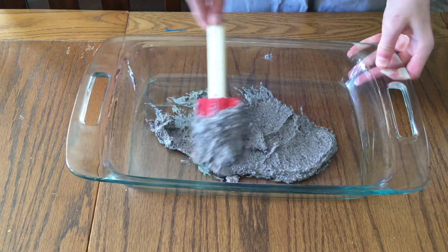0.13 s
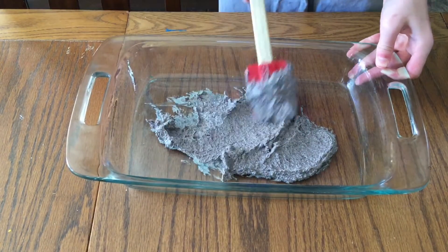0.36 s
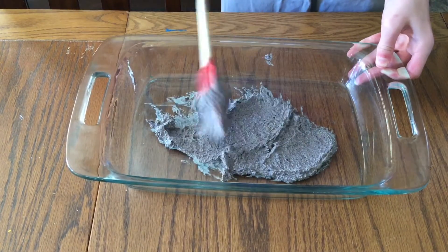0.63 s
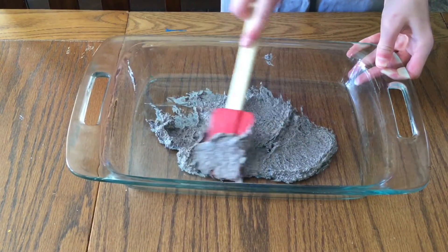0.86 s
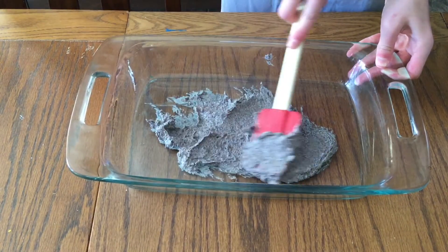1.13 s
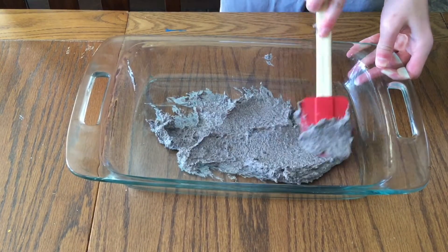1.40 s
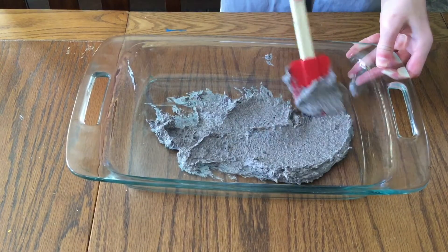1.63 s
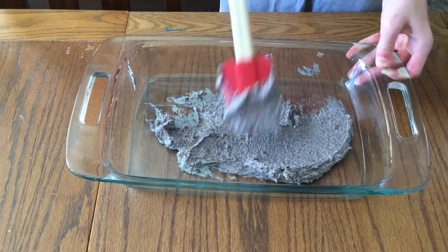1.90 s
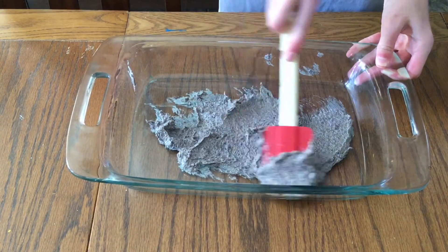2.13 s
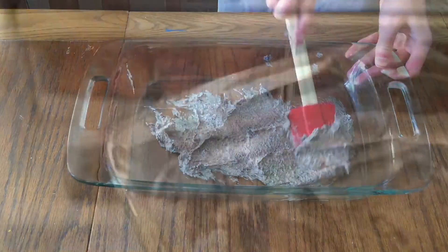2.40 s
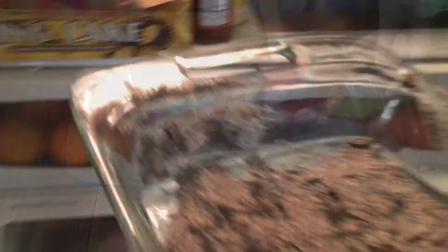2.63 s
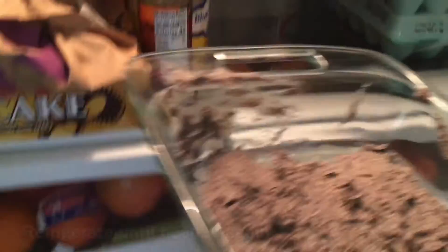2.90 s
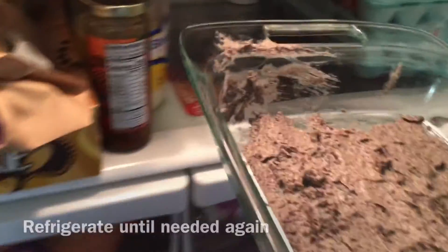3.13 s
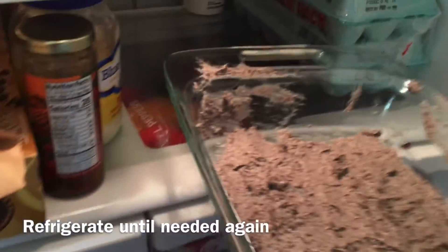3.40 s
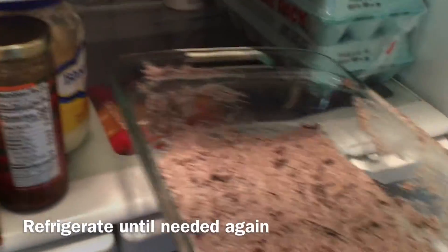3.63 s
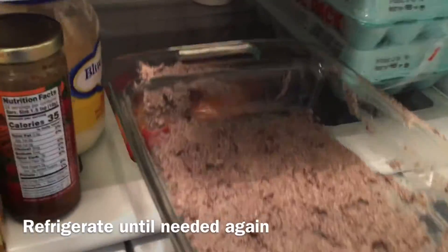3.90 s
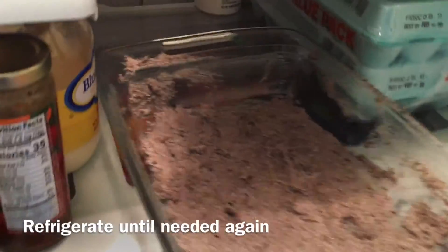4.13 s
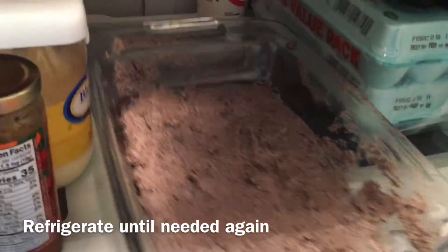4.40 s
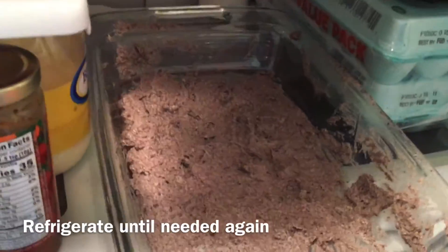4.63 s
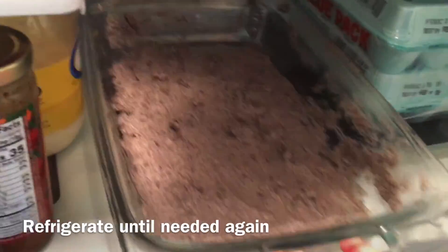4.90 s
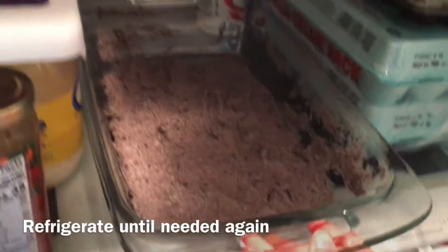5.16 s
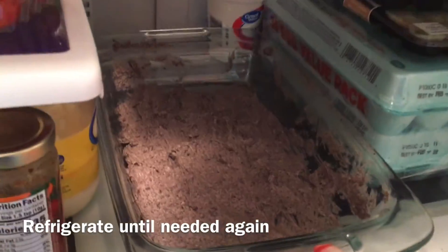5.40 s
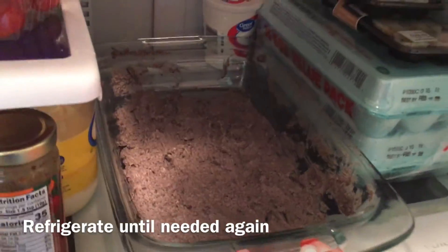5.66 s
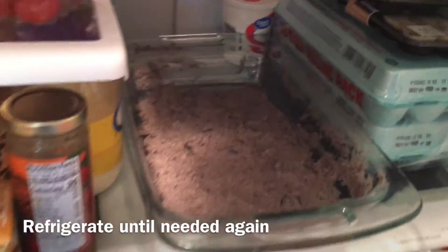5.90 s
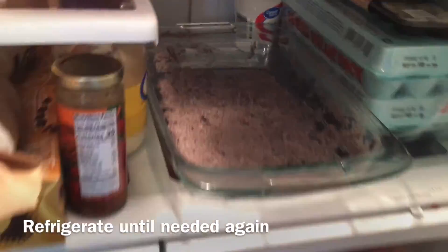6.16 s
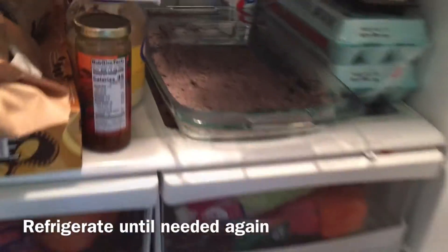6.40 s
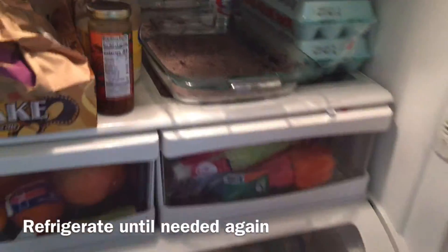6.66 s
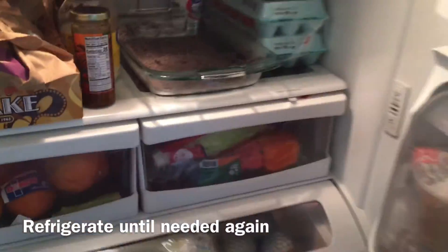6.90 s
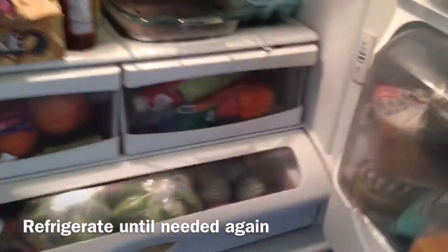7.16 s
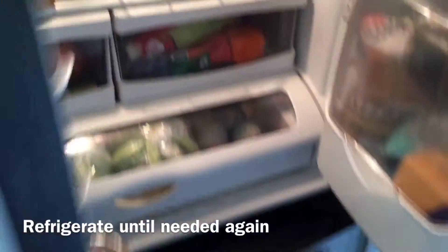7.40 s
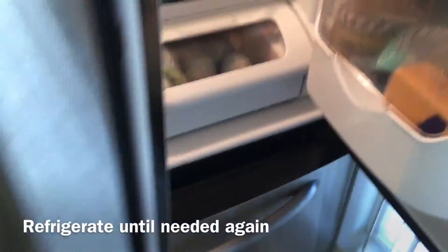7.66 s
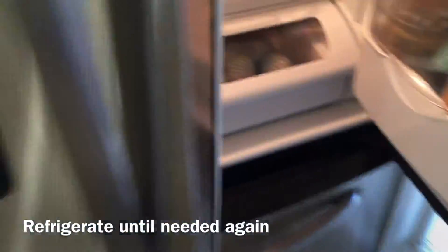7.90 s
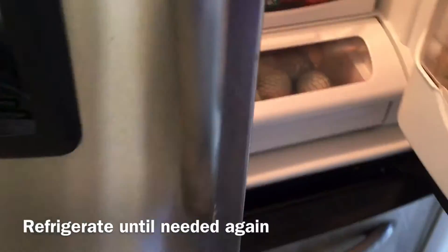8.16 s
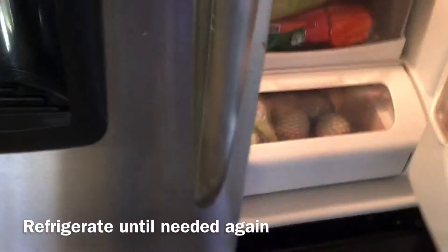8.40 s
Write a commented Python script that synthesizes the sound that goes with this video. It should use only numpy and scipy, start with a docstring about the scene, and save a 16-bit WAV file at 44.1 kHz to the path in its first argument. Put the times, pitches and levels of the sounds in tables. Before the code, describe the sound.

Quiet spreading of thick paste in glass, with soft rubs and light ticks, comes first. Then a nearby fridge's low rumble and steady fan rise. Around the middle, hard woody, glassy knocks and deep thumps land in quick succession, one overloading the close microphone, followed by scraping and lighter taps. Soft handling noise and a thin squeak lead to a sharp double thud of the closing door at the end.

```python
"""First a soft spatula spreads a sticky mixture in a glass dish: grainy rubbing, tiny pops and light ticks over
mains hum and the rush of air. As the microphone goes from the table to the fridge, rumble and fan tones grow.
The dish is then set down on a shelf and pushed in: knocks ring the shelf and the glass, sliding hisses and
fittings squeak faintly; the loudest knock overloads the microphone. Last, the door is swung shut.
Noise is shaped for rubbing, air, squeaks and clacks; sines make the steady tones and the fading rings."""
import sys
import numpy as np
from scipy import signal
from scipy.fft import rfft, irfft
from scipy.io import wavfile
from scipy.ndimage import uniform_filter1d

SR = 44100
rng = np.random.default_rng(int(sys.argv[2]) if len(sys.argv) > 2 else 0)


def unload_wav(signal):
    """Save mono or channel-first audio to the path in sys.argv[1] as 16-bit WAV at rate SR, clipped to [-1, 1]."""
    wavfile.write(
        sys.argv[1],
        SR,
        np.round(np.clip(np.atleast_2d(signal).T, -1, 1) * 32767).astype(np.int16),
    )


def voltage_ratio(level):
    """Linear amplitude factor for a level in decibels (scalar or array-like)."""
    return 10 ** (np.asarray(level, float) / 20)


N = 376613  # length in samples


def along(table):
    """Turn a table of times and values into curves: each column, one value per sample."""
    s, *columns = np.transpose(table)
    return [np.interp(np.arange(N) / SR, s, c) for c in columns]


def unit(x):
    """Scale to rms 1."""
    return x / np.sqrt(np.mean(x ** 2))


def colour(x, points):
    """Shape a spectrum by (Hz, dB) points, joined on a logarithmic pitch scale; rms 1."""
    hz, db = np.transpose(points)
    f = np.arange(len(x) // 2 + 1) * SR / len(x) + 1
    curve_db = np.interp(np.log(f), np.log(hz), db)
    return unit(irfft(rfft(x) * voltage_ratio(curve_db), len(x)))


def walk(rate):
    """Slow random wandering: levels held 1 / rate seconds, then smoothed twice; spread near 1."""
    k = int(SR / rate)
    steps = np.repeat(rng.standard_normal(N // k + 1), k)
    return 1.14 * uniform_filter1d(uniform_filter1d(steps, k), k)[:N]


def tones(lines, waver_db):
    """Steady sines given as (Hz, rms dB), each with a level that wavers on its own."""
    t = np.arange(N) / SR
    out = np.zeros(N)
    for hz, db in lines:
        sine = np.sqrt(2) * np.sin(2 * np.pi * (hz * t + rng.random()))
        out += voltage_ratio(db + waver_db * walk(4.1)) * sine
    return out


def ring(modes, centre_hz, octaves, fall_db, luck, t):
    """A blow feeds fading modes near its centre most, higher ones less and less; rms 1 over the first 30 ms."""
    hz, db, t60 = np.array(modes, float).T[:, :, None]
    above = np.log2(hz / centre_hz)  # octaves above the centre
    share = np.exp(-.5 * (above / octaves) ** 2) + (above > 0) * voltage_ratio(fall_db * (2 + above))
    spot = voltage_ratio(1.5 * luck[:len(modes), None])  # each mode's chance gain or loss
    waves = np.sin(2 * np.pi * hz * t) * 1000 ** (-t / t60)
    y = np.sum(share * voltage_ratio(db) * spot * waves, axis=0)
    return y / np.sqrt(np.mean(y[t < .03] ** 2))


# How near the microphone is to the fridge's works.
# Each row: time in seconds, nearness in dB.
NEARNESS = [(0, -10), (1.0, -11), (1.9, -10), (2.2, -7.5), (2.4, -9), (2.65, -4), (2.96, 0), (3.64, 2),
            (4.32, 4), (5.16, 4.5), (5.79, 3), (6.16, 2), (6.41, -1), (6.87, -2), (7.38, -1.5),
            (7.75, -2.5), (8.08, -1), (8.54, -3)]


def near_gain(base_db, db_per_near_db):
    """A source's gain: its level at nearness 0, plus so many dB for each dB of nearness."""
    return voltage_ratio(base_db + db_per_near_db * along(NEARNESS)[0])


def at_table():
    """1 while the microphone is at the table, sinking to 0 as it leaves for the fridge."""
    return np.interp(np.arange(N) / SR, (2.1, 2.65), [1, 0])


# The low hum.
# Each row: pitch in Hz, level in dB before the hum's overall gain.
HUM_LINES = [(120.5, -2.5), (241, -21.5)]


def low_hum():
    """Wavering sines: mains hum at the table; near the fridge, a low resonance at about the same pitch."""
    gain = near_gain(-49.5, 2.2) + voltage_ratio(-42.5) * at_table()
    return gain * tones(HUM_LINES, 2.0)


# The colour of the rushing air.
# Each row: frequency in Hz, relative level in dB.
RUSH_COLOUR = [(150, -49), (260, -4.5), (322, -11.5), (355, -9), (404, -6.5), (531, -11), (652, -9),
               (1600, -27), (2080, -42.5), (3520, -120)]


def air_rush():
    """Unsteady air heard as shaped noise, 5 dB further off at the table."""
    noise = colour(rng.standard_normal(N), RUSH_COLOUR)
    return noise * near_gain(-50, .2) * voltage_ratio(-5 * at_table() + .7 * walk(20))


# The colour of the compressor's rumble.
# Each row: frequency in Hz, relative level in dB.
RUMBLE_COLOUR = [(15, -40.5), (25, -21), (42, -14.5), (59, 7.5), (75, -3), (91, 4.5), (150, 2.5),
                 (167, 0.5), (203, 0.5), (330, -9.5), (430, -45), (730, -120)]


def compressor_rumble():
    """The compressor's uneven deep rumble is shaped noise, growing with nearness."""
    noise = colour(rng.standard_normal(N), RUMBLE_COLOUR)
    return noise * near_gain(-40, 1.1) * voltage_ratio(1.6 * walk(9))


def drone():
    """One low sine that wavers and grows a little with nearness."""
    return near_gain(-50, .5) * tones([(148.5, 0)], 1.8)


# The fan's tones.
# Each row: pitch in Hz, level in dB before the fan's overall gain.
FAN_LINES = [(351, 6.5), (525, 5)]


def fan_tones():
    """Steady sines of the fan, growing with nearness."""
    return near_gain(-62.5, 1.6) * tones(FAN_LINES, 1)


# The whine comes and goes.
# Each row: time in seconds, level in dB.
WHINE_LEVEL = [(0, -95), (2.2, -92), (2.96, -80), (5.2, -77), (5.5, -71), (5.9, -72), (6.35, -82),
               (7.5, -84), (7.8, -76), (8.1, -85), (8.54, -85)]


def whine():
    """One thin, very high sine whose level follows the table and wavers."""
    return voltage_ratio(along(WHINE_LEVEL)[0]) * tones([(14400, 0)], 1.5)


# Strokes of blade, dish, hands and door seal; the row at 3.52 is the noisy tail of a knock.
# Each row: start in seconds, end in seconds, grit level in dB, fine hiss above grit in dB, onset in dB per second.
GRAIN_BURSTS = [(.07, .08, -66, 0, 300), (.17, .26, -60, -8, 300), (.3, .38, -61, -5, 200),
                (.45, .53, -60, -4, 300), (.65, .69, -63, 0, 150), (.8, .94, -58.5, -3, 150),
                (1.2, 1.6, -68, -1, 100), (1.63, 1.74, -56, -11, 300), (2.12, 2.14, -53, -5, 160),
                (2.22, 2.45, -64, -5, 100), (2.6, 2.72, -60, -4, 60), (2.87, 2.95, -60, 0, 80),
                (3.08, 3.36, -59, 4, 60), (3.52, 3.54, -35, -10, 3000), (3.82, 3.9, -40, -5, 2000),
                (4.01, 4.09, -37, -14, 2000), (4.17, 4.49, -42, -2, 300), (4.745, 5.22, -46, 1, 150),
                (5.085, 5.11, -41, 1, 400), (5.15, 5.23, -44, 3, 200), (5.7, 5.71, -55, -8, 500),
                (5.77, 5.86, -56, -4, 300), (6.15, 6.2, -62, 1, 60), (6.46, 6.52, -60, 4, 100),
                (6.6, 8.05, -59.5, -5, 40), (7.02, 7.2, -54, 0, 40), (7.55, 7.67, -60, 8, 150),
                (7.8, 7.86, -61, 5, 60), (8.04, 8.1, -52, -3, 80), (8.3, 8.35, -54, 5, 150),
                (8.365, 8.42, -29, -2, 3000), (8.485, 8.6, -29, -1, 2000)]


def grain_gains():
    """Gains of grit and hiss: each row rises, eases and dies by one rule, over a faint background noise."""
    t = np.arange(N) / SR
    # the background noise of room and microphone, set to grow with nearness
    grit_power = near_gain(-64, .45) ** 2
    hiss_power = near_gain(-68.5, .45) ** 2
    for start, end, db, fine_db, onset in GRAIN_BURSTS:
        rise_db = onset * np.clip(start - t, 0, 1)
        sag_db = 6 * np.clip(t - start, 0, .5)  # 6 dB per second for half a second
        # it lets go as it came, but no faster than 190 dB per second
        release_db = min(onset, 190) * np.clip(t - end, 0, 1)
        power = voltage_ratio(db - rise_db - sag_db - release_db) ** 2
        grit_power = grit_power + power
        hiss_power = hiss_power + power * voltage_ratio(fine_db) ** 2
    return np.sqrt(grit_power), np.sqrt(hiss_power)


def patchy(x, depth_db, rate):
    """Each octave swells and sinks alone, as the rubbing spot wanders over the surface."""
    spectrum = rfft(x)
    hz = np.arange(len(x) // 2 + 1) * SR / len(x)
    octave = np.clip(np.log2(hz / 500 + 1e-9), 0, 5)
    out = np.zeros(len(x))
    for k in range(6):
        band = irfft(spectrum * np.clip(1 - abs(octave - k), 0, 1), len(x))
        out += band * voltage_ratio(depth_db * walk(rate))
    return out


# The colour of the coarse grains.
# Each row: frequency in Hz, relative level in dB.
GRIT_COLOUR = [(530, -32), (900, -4), (1400, -1), (1520, -1), (2290, -1), (4670, -5.5), (5740, -14),
               (6500, -12), (8450, -38), (14300, -120)]
# The colour of the fine grains.
# Each row: frequency in Hz, relative level in dB.
HISS_COLOUR = [(2650, -40), (4500, -10), (5770, -4.5), (6560, -7), (7740, -5), (8410, -1.5), (10200, -3.5),
               (13100, -1.5), (15500, -6.5)]
# Ringing of the loaded glass dish, also used by the knocks.
# Each row: pitch in Hz, relative level in dB, seconds to fall 60 dB if nothing else damps it.
GLASS_MODES = [(1088, -3.5, .09), (1148, 24, 0.027), (1456, -9.5, .1), (1694, -9, .1), (1980, 10, 0.16),
               (2313, 2, .1), (2300, -10.5, .07), (2665, 6.5, 0.062), (3110, 6, 0.06), (3370, -8.5, .08),
               (4230, -15.5, .09), (4900, -5, .05), (5400, -18.5, .06)]


def slide():
    """Friction, with the background noise: dense uneven grains, coarse in the mids and fine in the treble."""
    grit_gain, hiss_gain = grain_gains()
    bumps_db = 2.6 * uniform_filter1d(rng.exponential(size=N), size=8)
    grains = rng.standard_normal(N) * voltage_ratio(bumps_db)
    catch = walk(35)  # the contact grips and lets go
    body = ring(GLASS_MODES, 2400, 1.2, -20, np.zeros(len(GLASS_MODES)), np.arange(SR // 8) / SR)
    # the rougher catches also set the glass ringing
    rung = unit(signal.fftconvolve(grains * voltage_ratio(4.0 * walk(40)), body)[:N])
    grit = unit(colour(grains, GRIT_COLOUR) + .4 * rung)
    grit = grit * grit_gain * voltage_ratio(1.2 * catch + 1.6 * walk(60))
    hiss = colour(grains, HISS_COLOUR) * hiss_gain * voltage_ratio(0.64 * catch + 1.5 * walk(60))
    return patchy(grit + hiss, depth_db=1.8, rate=22)


# The treble of a hard contact, for the pops and the knocks.
# Each row: frequency in Hz, relative level in dB.
SNAP_COLOUR = [(2000, -5), (4000, 5), (8000, -3), (14000, -3.5), (20000, -22)]


def paste():
    """The mixture parts from the blade in tiny pops, strongest while the blade rubs hardest."""
    hiss_gain = grain_gains()[1]
    rate, end_s = 90, 1.7  # average pops per second, last moment
    pops = (rng.random(N) < rate / SR) * voltage_ratio(3.0 * rng.exponential(size=N))
    pops = pops * (np.arange(N) < end_s * SR)
    tail = np.convolve(pops, np.exp(-np.arange(128) / 10.0))[:N]  # each pop lasts about a millisecond
    strength = voltage_ratio(-61) * (hiss_gain / hiss_gain[0]) ** .7
    return strength * tail * colour(rng.standard_normal(N), SNAP_COLOUR)


# Light ticks.
# Each row: time in seconds, peak level in dB, centre in Hz.
LIGHT_TICKS = [(0.0755, -34.5, 9000), (0.0844, -45, 6010), (0.164, -44, 2250), (0.279, -42, 1980),
               (0.3007, -40, 3450), (0.3347, -43.5, 5000), (0.348, -47, 1880), (0.4404, -32, 4260),
               (0.4555, -36, 9000), (0.7262, -42.5, 3030), (1.161, -46, 4320), (1.1951, -47.5, 1990),
               (2.143, -40, 3500), (1.622, -31, 1300), (4.3977, -28, 3200), (4.4922, -26.5, 2470),
               (4.6675, -39, 3500), (4.7084, -38, 3000), (5.0931, -23, 3200), (5.094, -22, 12000),
               (5.1644, -36.5, 2060), (5.218, -20.5, 13800), (5.3053, -32.5, 9430), (5.6936, -26, 8430),
               (5.7543, -33, 8410), (5.7638, -31.5, 4280), (6.1603, -32, 2500), (6.9862, -41, 5150)]


def ticks():
    """Light contacts: very short noise about one broad resonance, falling 60 dB in 27 ms."""
    t = np.arange(SR // 10) / SR
    out, noise = np.zeros(N + len(t)), rng.standard_normal(N + len(t))
    for s, peak_db, hz in LIGHT_TICKS:
        now = slice(int(s * SR), int(s * SR) + len(t))
        body = colour(noise[now], [(0.061 * hz, -40), (0.26 * hz, -8), (hz, 0), (2.4 * hz, -9), (6 * hz, -32)])
        tick = body * (1 - np.exp(-t / 0.0007)) * 1000 ** (-t / .027)
        out[now] += voltage_ratio(peak_db) * tick / np.abs(tick).max()
    return out[:N]


# Faint squeaks, and in the last row a burst of high hiss as the door shuts.
# Each row: start in seconds, end in seconds, pitch in Hz, width in Hz, level in dB before flutter and fades.
SQUEAKS_AND_DOOR_HISS = [(1.615, 1.72, 1580, 30, -55), (1.55, 1.72, 1880, 40, -64),
                         (2.55, 2.7, 2300, 60, -63), (2.54, 2.68, 2650, 60, -66),
                         (6.35, 6.41, 1900, 20, -68), (6.42, 6.55, 1900, 15, -63),
                         (7.51, 7.71, 2100, 50, -61), (7.5, 7.67, 5800, 200, -58),
                         (7.51, 7.72, 11250, 220, -57), (8.06, 8.14, 3500, 120, -66),
                         (4.48, 4.74, 2450, 40, -65), (8.41, 8.47, 9300, 500, -38)]


def squeaks_and_door_hiss():
    """Noise about one pitch, in an uneven flutter: narrow for a breathy squeak, broad for the door's hiss."""
    t, out = np.arange(N) / SR, np.zeros(N)
    for start, end, hz, width, db in SQUEAKS_AND_DOOR_HISS:
        peak = [(hz - 9 * width, -50), (hz - 2 * width, -16), (hz, 0), (hz + 2 * width, -16), (hz + 9 * width, -50)]
        tone = colour(rng.standard_normal(N), peak)
        fades = np.clip(np.minimum(t - start, end - t) / .035, 0, 1)  # 35 ms in and out
        out += voltage_ratio(db + 1.5 * walk(45)) * tone * fades
    return out


# Ringing of the shelf and the table top.
# Each row: pitch in Hz, relative level in dB, seconds to fall 60 dB.
BOARD_MODES = [(62, 0, .3), (80, -3, .25), (98, 3, .24), (114, 0, .16), (135, 1, .14), (152, -1, .14),
               (172, -1, .16), (203, 2, .18), (228, -2, .14), (250, -2, .14), (275, -1, .17),
               (320, -3, .11), (360, -3, .11), (406, 0, .13), (450, -1, .1), (495, -1, .1), (560, -2, .09),
               (640, 0, .09), (700, -2, .08), (770, 0, .08), (880, -2, .07)]
# The knocks; levels are set before the build-up and the mix of clack and glass.
# Each row: time in seconds, clack level in dB, treble snap level in dB, thump level in dB, thump centre in Hz.
BLOWS = [(1.621, -26, -64, -28, 162), (1.637, -33, -68, -27, 140), (3.28, -27, -57, -39, 145),
         (3.514, -18, -25, -7.5, 245), (3.522, -26, -31, -20, 430), (3.804, -13, -19, 2, 120),
         (3.853, -22, -36, -9, 196), (3.879, -16, -26, -8.5, 143), (3.906, -30, -57, -19, 105),
         (3.94, -18.5, -41, -18, 130), (4.004, 6, 2, 5.5, 128), (4.029, -6.5, -31, 5, 104.7),
         (4.066, -4.5, -17, -18, 102), (4.155, -33, -36, -14, 190), (4.189, -6, -21, -10, 175),
         (4.53, -29, -50, -15, 129), (4.797, -28, -50, -29, 500), (4.843, -34, -39, -22.5, 70),
         (5.153, -36.5, -37.5, -22.5, 147), (5.176, -21.5, -57.5, -18, 114),
         (5.275, -26.5, -57.5, -22.5, 231), (5.826, -20.5, -41, -17.5, 125), (5.84, -40, -51, -27, 430),
         (8.362, -8.5, -18, -16.5, 230), (8.375, -12, -25.5, -18, 250), (8.398, -24, -44, -11, 61.3),
         (8.43, -20, -32, -21, 190), (8.445, -11, -21, -15.5, 70), (8.482, -4, -11, -15, 185),
         (8.504, -15, -38, -12, 262)]


def knocks():
    """Each blow: a woody clack, a bright snap, the short ring of the glass and a thump of the board under it."""
    t = np.arange(SR // 2) / SR
    out, noise = np.zeros(N + len(t)), rng.standard_normal(N + len(t))
    snap = colour(rng.standard_normal(N + len(t)), SNAP_COLOUR)
    luck = rng.standard_normal((len(BLOWS), 40))
    for (s, clack_db, snap_db, thump_db, thump_hz), chance in zip(BLOWS, luck):
        now = slice(int(s * SR), int(s * SR) + len(t))
        t60 = np.clip(.045 - .001 * clack_db, .004, .4)  # seconds; weaker, softer blows last longer
        # contact builds up in a few milliseconds; the cabinet returns a weaker, longer tail
        shape = (1 - np.exp(-t / 0.0022)) * (1000 ** (-t / t60) + 0.1 * 1000 ** (-t / .25))
        # a harder contact is brighter and wakes more of the glass
        hard = np.clip(voltage_ratio(.5 * (snap_db - clack_db)), .1, 1)
        wood = [(140, -30), (330, -7), (600, 0), (700 + 3500 * hard, -8), (1400 + 9000 * hard, -30)]
        clack = colour(noise[now], wood) * shape
        glass = hard * ring(GLASS_MODES, 5000 * hard, 0.74, -20, chance[24:], t)
        glass = glass * 1000 ** (-t / (3 * t60))  # the blow's own damping
        # the heavy board takes about a cycle to get moving
        rise = 1 - np.exp(-t * thump_hz / .8)
        thump = ring(BOARD_MODES, thump_hz, 0.28, -5, chance, t) * rise
        out[now] += voltage_ratio(clack_db) * (0.5 * clack + 0.16 * glass)
        out[now] += voltage_ratio(snap_db) * snap[now] * shape
        out[now] += voltage_ratio(thump_db) * thump
    return out[:N]


def scene():
    """Everything reaches one close microphone."""
    machines = low_hum() + air_rush() + compressor_rumble() + drone() + fan_tones() + whine()
    contacts = slide() + paste() + ticks() + squeaks_and_door_hiss() + knocks()
    return (machines + contacts)[None]


def top_cut(x):
    """Nothing passes above the cut-off."""
    return signal.sosfilt(signal.butter(12, 15630, fs=SR, output="sos"), x)


def record(dry):
    """The microphone loses the deepest bass and the top; then the loudest peaks hit the ceiling."""
    x = signal.sosfilt(signal.butter(4, 52, "high", fs=SR, output="sos"), dry)
    x = signal.sosfilt(signal.ellip(8, .2, 60, 15700, fs=SR, output="sos"), x)
    mix = np.clip(x, -1, 1)
    return top_cut(mix)


dry = scene()
out = record(dry)
unload_wav(out)
```